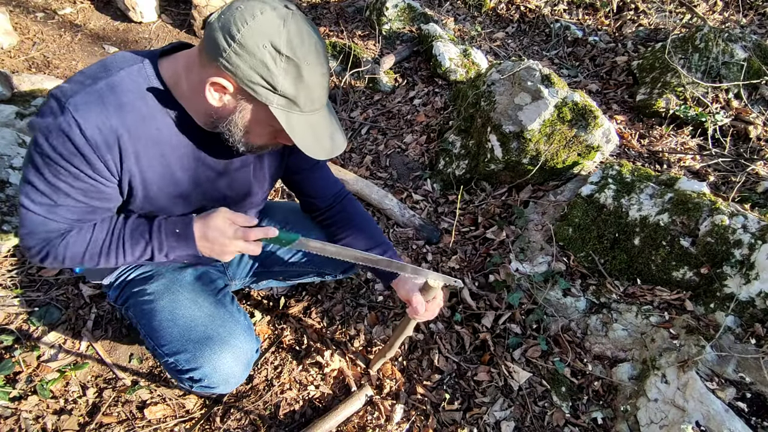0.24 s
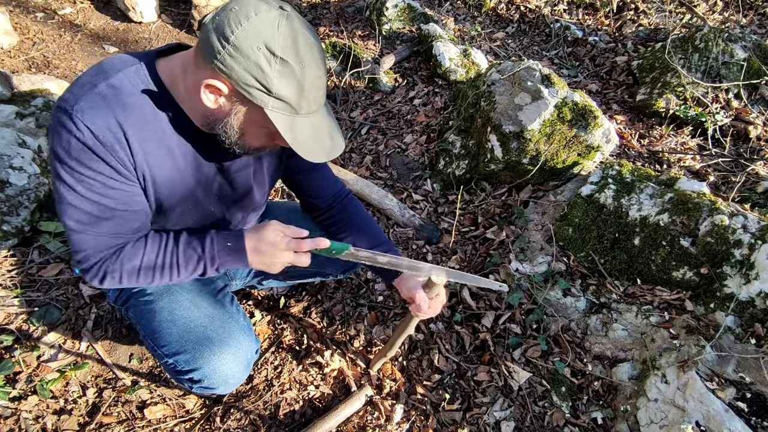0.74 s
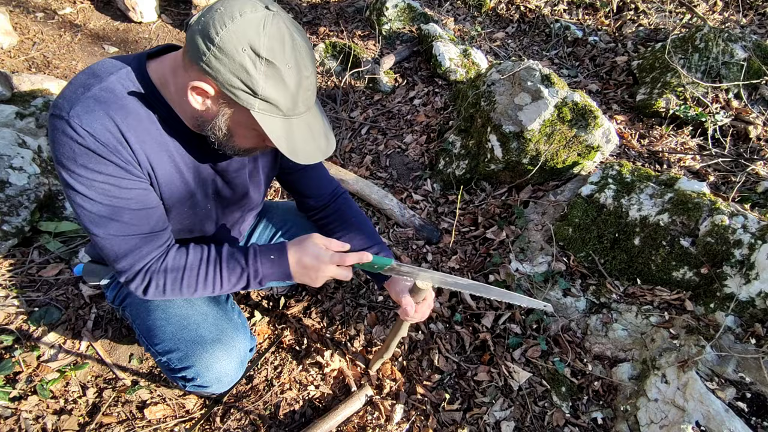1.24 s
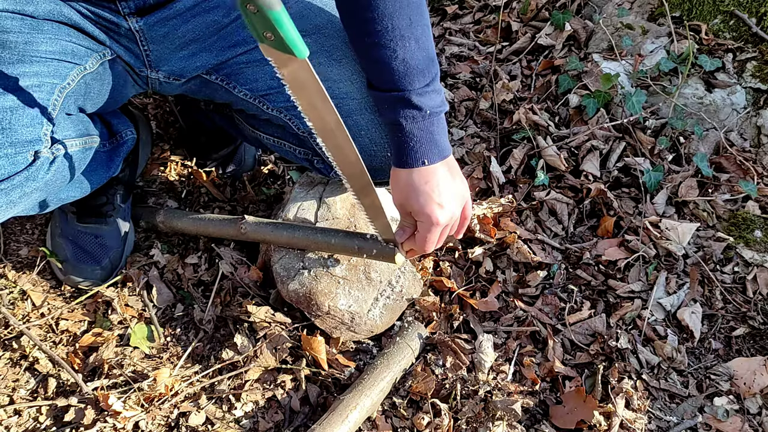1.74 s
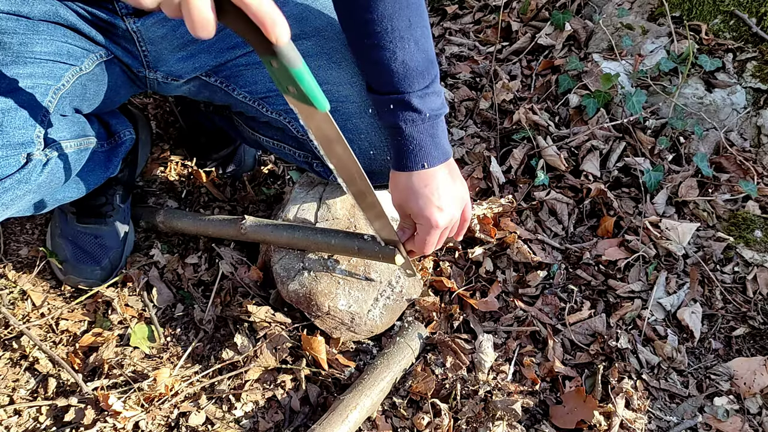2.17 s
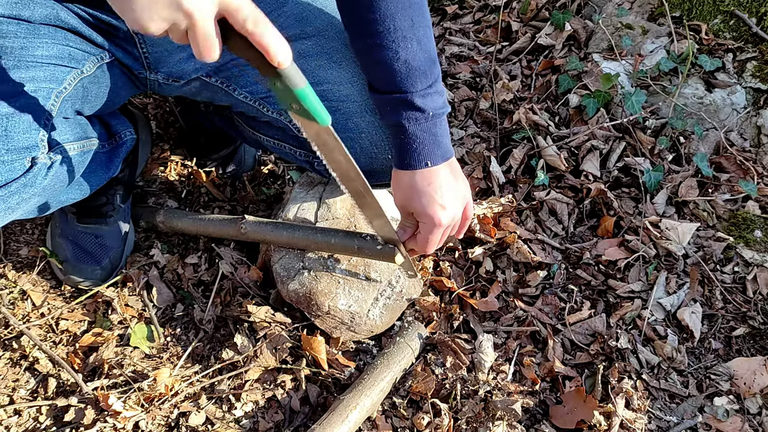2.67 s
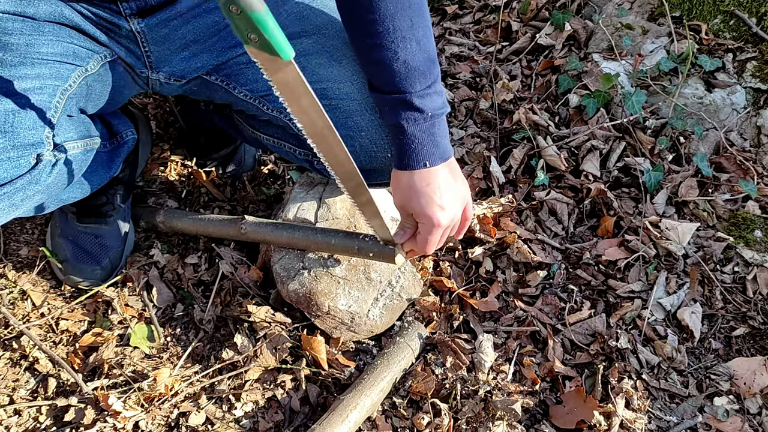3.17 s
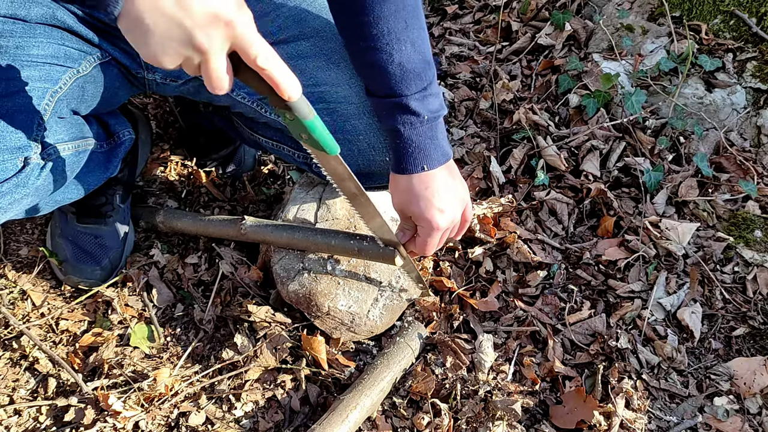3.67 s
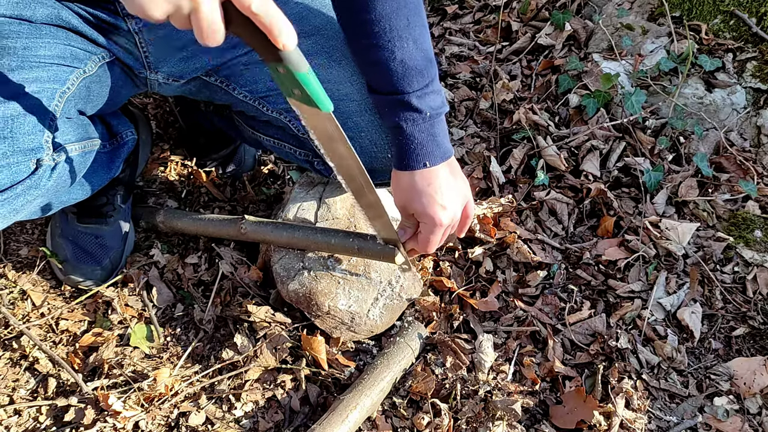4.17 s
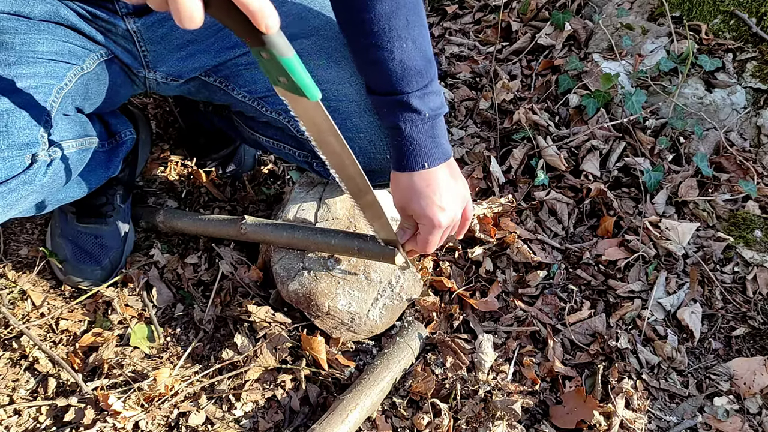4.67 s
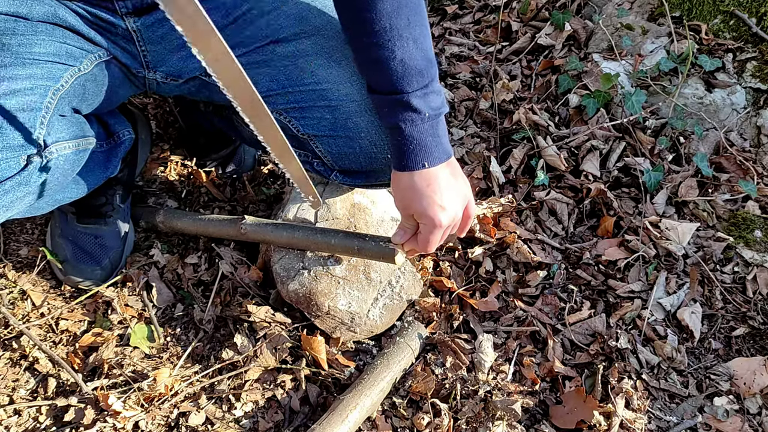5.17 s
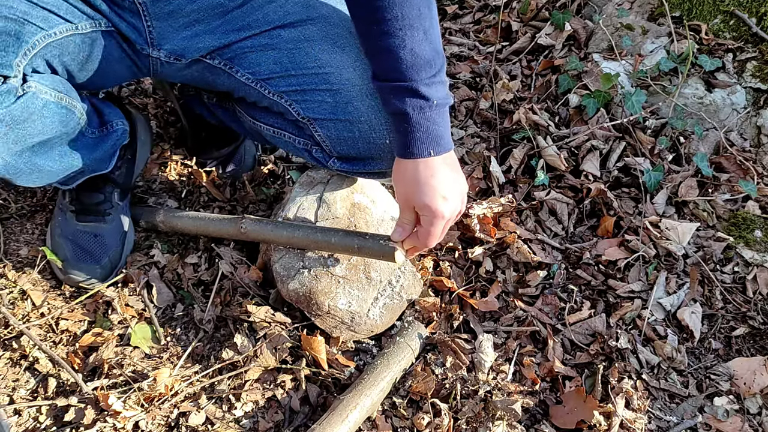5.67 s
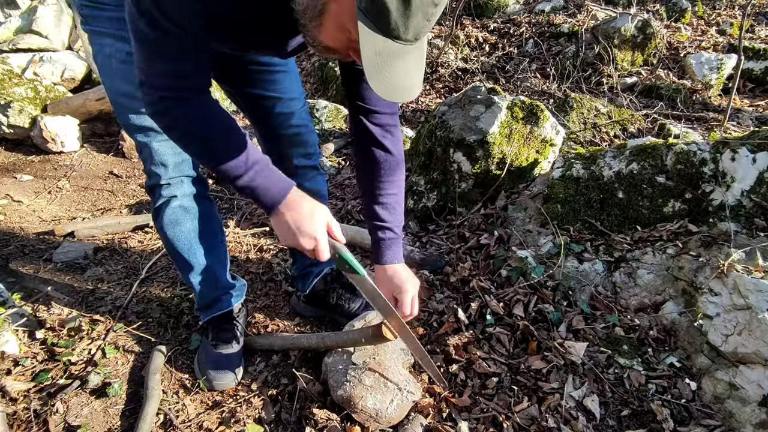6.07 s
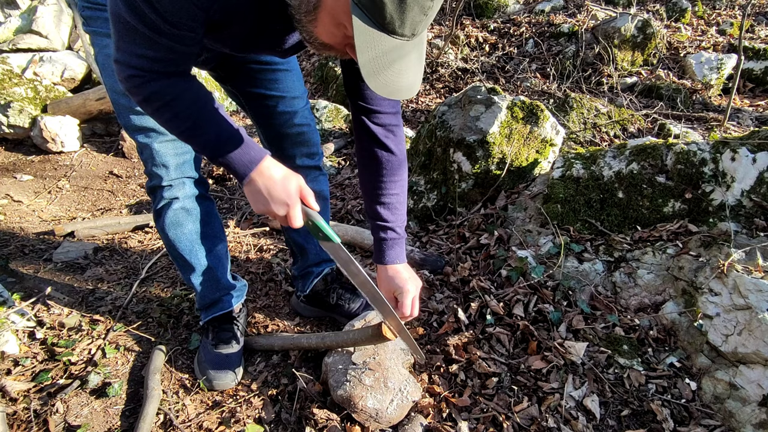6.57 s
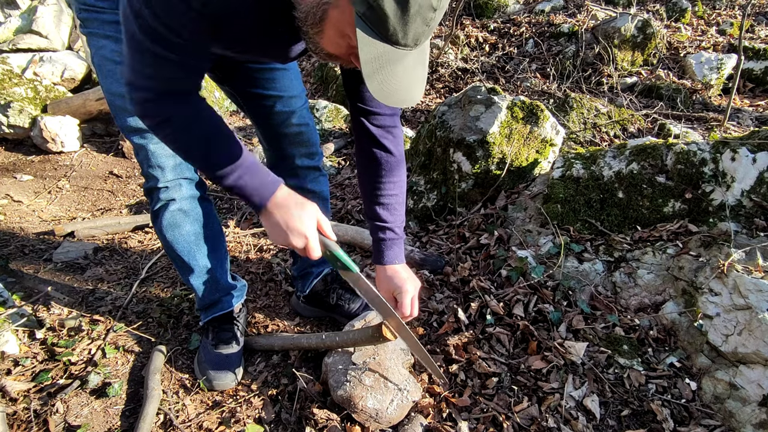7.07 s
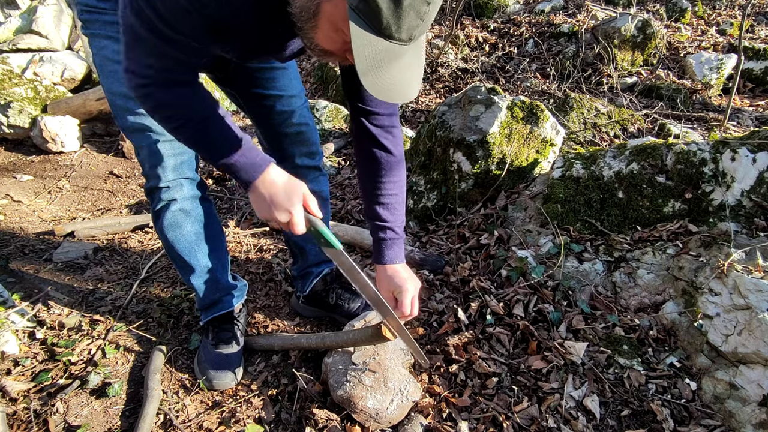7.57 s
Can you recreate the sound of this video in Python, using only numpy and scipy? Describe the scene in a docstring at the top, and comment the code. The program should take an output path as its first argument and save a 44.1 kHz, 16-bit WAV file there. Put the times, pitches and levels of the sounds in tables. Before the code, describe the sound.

Slow, thin saw strokes quicken into steady rasping on fresh wood, wind buffets rumble, then after a short gap louder strokes grate with low woody shudders.

```python
"""Slow saw strokes in the hand, then quick ones over a stone, cut a green branch outdoors. Tooth knocks
at a rate that follows the stroke and tearing noise feed resonances of blade, cut and branch.
Faint forest hiss and low rumbling wind noise lie underneath; buffets thump the microphone from about 2 s.
A pause follows, in which the blade zings; then come harder standing strokes, with short shudder tones
that bend with the tooth rate, while the wind dies away."""
import sys
import numpy as np
from scipy import signal
from scipy.fft import rfft, irfft, next_fast_len
from scipy.io import wavfile
from scipy.ndimage import uniform_filter1d

SR = 44100
rng = np.random.default_rng(int(sys.argv[2]) if len(sys.argv) > 2 else 0)


def transcribe(signal):
    """Save signal, clipped to [-1, 1], as a 16-bit WAV file at the path in sys.argv[1]."""
    frames = np.atleast_2d(signal).T
    limited = np.clip(frames, -1, 1)
    pcm = np.round(limited * 32767).astype(np.int16)
    wavfile.write(sys.argv[1], SR, pcm)


N = 344862
TIME = np.arange(N) / SR
SIZE = next_fast_len(N + 8192, True)  # padded, so that filter tails do not wrap round
FREQ = np.maximum(np.arange(SIZE // 2 + 1) * SR / SIZE, 1)

# Levels in the tables are nominal: mixes, trims and random flutter come on top.
# saw strokes, pull and push by turns, each hold opening with a pull: (start [s], end [s], level [dB])
STROKES = [(-0.089, 0.253, -47.5), (0.287, 0.602, -49.5), (0.643, 1.033, -47.0), (1.065, 1.45, -51.5),
           (1.316, 1.486, -48.5), (1.475, 1.653, -45.5), (1.64, 1.839, -49), (1.807, 2.003, -46.5),
           (1.999, 2.172, -50), (2.129, 2.337, -45.5), (2.336, 2.52, -49.5), (2.499, 2.678, -46),
           (2.699, 2.865, -49.5), (2.883, 3.052, -46), (3.079, 3.258, -46.5), (3.231, 3.452, -47.0),
           (3.455, 3.617, -48.5), (3.597, 3.787, -45), (3.793, 3.986, -49.5), (3.963, 4.149, -45),
           (4.152, 4.338, -49), (4.315, 4.514, -46.5), (4.532, 4.69, -48), (4.663, 4.896, -46.5),
           (4.913, 5.139, -49), (5.877, 6.068, -41.5), (6.056, 6.238, -42.5), (6.223, 6.41, -42),
           (6.403, 6.578, -40.5), (6.559, 6.733, -40.5), (6.723, 6.892, -38.5), (6.877, 7.065, -40),
           (7.054, 7.235, -39.0), (7.226, 7.4, -39.5), (7.392, 7.573, -38), (7.56, 7.739, -41),
           (7.737, 7.89, -41.0)]
# bounds of the three holds, in the hand, kneeling over the stone, standing: (time [s])
HOLD_BOUNDS_S = [0, 1.328, 5.7, 7.9]
# arm in each hold, a pull row then a push row: (hardest bite [0-1 of stroke], sharpness of swell [power],
# top tooth rate of a usual stroke [Hz], rasp against blade [dB], branch against blade [dB])
ARM_HAND = [(.35, 1.61, 320, -6, -18), (.28, .56, 298, -8, -10)]
ARM_KNEEL = [(.52, 1.2, 379.7, -8, -3), (.72, 2.63, 300.2, -9.5, -1.65)]
ARM_STAND = [(.45, 1.3, 319.2, -7, -7), (.65, 2.15, 400, -6.5, -0.5)]
# blade resonances in each hold: (frequency [Hz], width [Hz], lift [dB])
BLADE_HAND = [(3400, 1100, 5.5), (4550, 300, 5.5), (5130, 220, 2), (6720, 320, 9), (10540, 650, 5.5),
              (12030, 370, 11.5), (13000, 200, 10), (13540, 224, 13)]
BLADE_KNEEL = [(1640, 140, 4.2), (5000, 100, 2.2), (6790, 100, 11), (7450, 52, 3.8), (7990, 240, 7.2),
               (11350, 240, 1.5), (11400, 110, 3.5), (12998, 58, 1.3), (15200, 130, 3.3)]
BLADE_STAND = [(2180, 360, 9.3), (2790, 120, 7.4), (4940, 44, 2), (5380, 120, 3.8), (7030, 110, 10.4),
               (10180, 370, 4.9), (11970, 140, 3.6), (12800, 130, 5.6), (13400, 230, 4.7)]
# broad tone of the blade in each hold: (frequency [Hz], relative level [dB])
SLOPE_HAND = [(900, -13), (2000, -12), (3000, -11.5), (6000, -8), (10000, -7.5), (15400, -15)]
SLOPE_KNEEL = [(900, -5.5), (2000, -12), (3600, -6.5), (6000, -8), (10000, -7), (15400, -9.5)]
SLOPE_STAND = [(900, -11.5), (1800, -21.5), (2400, -12), (4400, -7.5), (6200, -7), (10000, -9),
               (15400, -13.5)]
# teeth rasping in the cut, broad tone: (frequency [Hz], relative level [dB])
RASP_TONE = [(250, -30), (450, -11), (560, -1.8), (680, 4.2), (850, 1.3), (1150, 0.2), (1500, -0.6),
             (1850, -10.5), (2600, -16), (5000, -17)]
# resonances of the cut in each hold: (frequency [Hz], width [Hz], lift [dB])
CUT_HAND = [(760, 100, 5), (1380, 300, 1.5)]
CUT_KNEEL = [(693, 86, 2.2), (940, 680, 2.2), (1330, 100, 0.95)]
CUT_STAND = [(430, 300, 6.4), (1190, 300, 7.9)]
# bending modes of the branch in each hold: (frequency [Hz], width [Hz], relative level [dB])
BRANCH_HAND = [(150, 80, -29), (260, 58, 3), (383, 240, -7.5)]
BRANCH_KNEEL = [(183.6, 91, 0), (247, 98, 2), (323.5, 90, 0.5), (397, 72, -4)]
BRANCH_STAND = [(116, 48, -5), (188.55, 56, -3.5), (263, 12, -0.5), (312, 31, 3.5), (410, 133, -2)]
# wind rumble on the microphone: (time [s], level [dB], left minus right [dB])
WIND = [(0.0, -72.5, 12), (0.06, -62, -4), (0.49, -60.5, 4.5), (1.9, -57.5, -2), (1.97, -59, -14),
        (2.15, -55, 25), (2.25, -62.5, -8), (2.61, -66, -9), (2.66, -62.5, 3), (3.14, -70, -0.5),
        (3.36, -48.5, -11), (3.5, -57, -3.5), (3.55, -46.5, -32), (4.33, -53, 8), (4.95, -58, 1),
        (5.07, -54.5, 8.0), (5.16, -44, -18.0), (5.28, -49, 12), (5.47, -55, 10), (5.6, -45, -16),
        (5.65, -51.5, 6), (5.85, -63.5, -4)]
# colour of the rumble: (frequency [Hz], relative level [dB])
WIND_COLOUR = [(20, -33), (40, -28), (70, -0.5), (110, 0), (160, -6.5), (240, -15), (400, -32.5),
               (900, -67)]
# single buffets of wind: (centre [s], level [dB], left minus right [dB])
BUFFETS = [(2.125, -42, 4), (2.583, -35.5, -11), (3.595, -33, -20), (3.659, -35.5, -7), (3.815, -25, -4),
           (4.435, -35.5, -3), (5.154, -31.5, -30), (5.3, -35, 24), (5.585, -31, -21)]
# colour of the eddies behind a buffet: (frequency [Hz], relative level [dB])
WAKE_COLOUR = [(40, -35), (110, 4), (220, -6.5), (330, -11.5), (480, -40), (900, -62)]
# still forest air: (frequency [Hz], relative level [dB])
AIR_COLOUR = [(150, -12), (300, 0.5), (600, -7), (1200, -10), (2200, -18.5), (4000, -20.5), (6500, -21),
              (8200, -28.5), (10500, -24.5), (15000, -33.5)]
# the blade zings as it enters or leaves the cut: (start [s], length [s], level [dB])
SCRAPES = [(0.328, 0.006, -49.5), (0.973, 0.017, -61), (2.724, 0.036, -58), (3.204, 0.0092, -53),
           (5.088, .048, -43.5), (5.745, 0.07, -54.5), (5.849, 0.023, -45), (6.243, 0.017, -55),
           (6.588, 0.014, -50), (7.243, 0.014, -53), (7.588, 0.013, -54)]
# how a scrape is shared out: (blade [dB], rasp [dB], branch [dB])
SCRAPE_MIX_DB = (-0.5, -15.5, -8)
# a tooth snags and jolts the wood: (start [s], level [dB])
SNAGS = [(2.933, -52), (5.848, -55), (5.953, -34), (6.155, -45)]
# how a snag is shared out: (blade [dB], rasp [dB], branch [dB])
SNAG_MIX_DB = (-24, -11.5, 1)
# the teeth catch and the branch shudders: (centre [s], length [s], level [dB], pitch at centre [Hz])
SHUDDERS = [(5.958, 0.067, -27.5, 296.3), (5.993, .09, -31, 262), (6.164, 0.088, -29.5, 303.7),
            (6.322, 0.054, -27, 297.8), (6.488, 0.033, -31, 310), (6.54, .051, -46, 304),
            (6.799, 0.037, -38.5, 356), (6.849, 0.049, -37.5, 313), (7.007, 0.083, -28, 307),
            (7.131, 0.028, -34, 339), (7.346, 0.072, -35.5, 315), (7.472, .022, -34, 309),
            (7.536, 0.047, -37.5, 284.6), (7.674, .087, -28, 306), (7.815, 0.033, -34.5, 318.2)]
# dips and bumps of the microphone housing: (frequency [Hz], width [Hz], lift [dB])
HOUSING = [(5620, 110, -6), (7070, 260, -10), (8400, 1150, 7), (11270, 250, -15)]
# treble balance of the two ports: (frequency [Hz], left minus right [dB])
PORT_BALANCE = [(300, -0.5), (1500, -1.5), (3500, -1), (5000, -3), (6500, -0.5), (8100, -13.5), (9200, -4),
                (10400, 8), (11700, 0), (15000, -1)]

PULL_EASE_S, PUSH_EASE_S = 0.025, 0.041  # the teeth grip sooner on a pull than on a push
TOOTH_RATE_PER_DB = 0.28  # a harder stroke is faster: share of the rate per dB over the usual stroke
BUFFET_HZ, BUFFET_CYCLES = 121, 2.3
WAKE_S, WAKE_DB = 0.05, -9
SNAG_S = 0.031
SHUDDER_FOLLOW = 0.22  # power by which a shudder's pitch follows the tooth rate
PORT_LAG_S = 7e-5
TOP_HZ = 15550


def undb(db):
    """Turn decibels into gain."""
    return 10 ** (np.asarray(db) / 20)


def noise():
    """Unrelated white noise for left and right."""
    return rng.standard_normal((2, N))


def walk(rate):
    """Random values, rate per second, joined by straight lines; spread near 1."""
    k = max(int(SR / rate), 1)
    steps = np.repeat(rng.standard_normal(N // k + 1), k)
    return 1.27 * uniform_filter1d(steps, k)[:N]


def slope_db(points):
    """Outline in dB on the frequency grid, straight over log frequency."""
    hz, db = np.transpose(points)
    return np.interp(np.log(FREQ), np.log(hz), db)


def bells_db(rows):
    """Bell-shaped lifts and dips in dB on the frequency grid."""
    return sum(db / (1 + (2 * (FREQ - hz) / width) ** 2) for hz, width, db in rows)


def filtered(x, response):
    """Apply a frequency response."""
    return irfft(rfft(x, SIZE) * response, SIZE)[..., :N]


def coloured(x, response):
    """Apply a response scaled to keep the power of white noise."""
    return filtered(x, response / np.sqrt(np.mean(np.abs(response) ** 2)))


def spread(pair, side_db):
    """Use two signals as mid and side."""
    side = undb(side_db)
    return (pair[0] + side * pair[1] * np.array([[1], [-1]])) / np.sqrt(1 + side ** 2)


def window(centre, length):
    """A smooth swell and fall."""
    return np.cos(np.pi * np.clip((TIME - centre) / length, -.5, .5)) ** 2


def jolt(start, length):
    """A quick rise and a slower fall."""
    return np.interp(TIME - start, [0, length / 10, length], [0, 1, 0]) ** .5


def ringing(x, rings, place):
    """Pass x through rings (spots, 2, samples), crossfading at even power as the blade slides."""
    out = 0
    for spot, ring in zip(np.linspace(0, 1, len(rings)), rings):
        near = np.sqrt(np.maximum(1 - np.abs(place - spot) * (len(rings) - 1), 0))
        ring = ring / np.linalg.norm(ring, axis=1, keepdims=True)
        out = out + signal.fftconvolve(x * near, ring, axes=1)[:, :N]
    return out


def strokes_by_hold():
    """Each stroke with its hold's limits, push flag, arm row and dB over the usual stroke of its kind."""
    for first, last, ways in zip(HOLD_BOUNDS_S, HOLD_BOUNDS_S[1:], (ARM_HAND, ARM_KNEEL, ARM_STAND)):
        rows = np.array([row for row in STROKES if first <= (row[0] + row[1]) / 2 < last])
        for k, row in enumerate(rows):
            pushing = k % 2
            effort_db = row[2] - rows[pushing::2, 2].mean()
            yield row, (first, last), pushing, ways[pushing], effort_db


def arm(rate_power=.65, rest_db=-73, snag_db=1.45):
    """Strokes set the tooth rate, the place along the blade (0-1) and the drive of blade, rasp, branch."""
    rate, place, drive = np.full(N, 40.), np.zeros(N), np.zeros((3, N))
    for (start, end, db), hold, pushing, way, effort_db in strokes_by_hold():
        crest, power, tooth_hz, rasp_db, branch_db = way
        on = slice(*np.searchsorted(TIME, np.clip([start, end], *hold)))
        u = (TIME[on] - start) / (end - start)
        swing = np.interp(u, [0, np.clip(crest, .1, .9), 1], [0, .5, 1])
        # the hand's pressure peaks early or late; its speed is more even
        speed = np.abs(np.sin(np.pi * (u + swing) / 2)) ** (rate_power * power)
        pressure = np.abs(np.sin(np.pi * swing)) ** power
        top_rate = tooth_hz * (1 + TOOTH_RATE_PER_DB * effort_db)
        rate[on] = np.maximum(top_rate * speed, rate[on])
        # each stroke uses a different length of the blade
        reach = rng.uniform(.5, 1)
        place[on] = (1 + (-1) ** pushing * np.cos(np.pi * u) * reach) / 2
        ease = np.minimum((TIME[on] - start) / (PUSH_EASE_S if pushing else PULL_EASE_S), 1)
        levels = undb([db, db + rasp_db, db + branch_db])[:, None]
        drive[:, on] += levels * ease * pressure
    # uneven grain makes the blade snag and slip
    drive *= undb(snag_db * walk(70))
    # the blade still rubs a little as it turns round
    moving = uniform_filter1d(1. * (drive[0] > 0), SR // 10)
    drive[0] += undb(rest_db) * np.sqrt(np.abs(moving))
    return rate, place, drive


def teeth(rate, jitter=0.026, scatter_db=1.5, set_db=6.0):
    """One knock per tooth, alternate sets biting unequally; also the phase within each tooth."""
    turns = np.cumsum(rate * undb(.18 * walk(45))) / SR + jitter * walk(300)
    tooth = np.floor(turns + 1).astype(int)
    scatter = np.clip(rng.standard_normal(4096), -2, 2)[tooth]
    size = undb(scatter_db * scatter + set_db * (-1.) ** tooth)
    size /= np.sqrt(np.mean(size ** 2))
    bites = np.diff(tooth, prepend=tooth[0]) > 0
    # sqrt(SR / rate) keeps the power even when knocks are sparse
    return bites * size * np.sqrt(SR / rate), turns % 1


def tearing(phase, depth=0.24, grain_db=0.5):
    """Fibres tear as dense noise, hardest around each tooth's bite."""
    gate = (1 + depth * np.cos(2 * np.pi * phase)) * undb(grain_db * walk(700))
    return noise() * gate / np.sqrt(np.mean(gate ** 2))


def steel(tear, place, t60=0.039, direct=0.17, count=120, size=6):
    """Quickly damped blade modes; pitch and strength depend on where the cut grips the blade."""
    t = TIME[:4096]
    hz = (np.arange(count) + rng.random((size, count)))[..., None] * SR / 2 / count
    modes = np.sin(2 * np.pi * hz * t) * np.exp(-np.log(1000) * t / t60)
    strengths = np.cos(2 * np.pi * rng.random((size, 2, count)))
    spectra = rfft(strengths @ modes)
    # neighbouring modes share a steady total of energy
    spectra /= np.sqrt(uniform_filter1d(np.abs(spectra) ** 2, size=64))
    return (direct * tear + ringing(tear, irfft(spectra), place)) / np.hypot(1, direct)


def green_wood(knocks, place, t60=0.035, side_db=-7.0, count=5):
    """Damp wood smears each knock into a short decaying burst of noise."""
    t = TIME[:2048]
    decay = np.exp(-np.log(1000) * t / t60)
    rings = [spread(rng.standard_normal((2, len(t))), side_db) * decay for _ in range(count)]
    return ringing(np.array([knocks, knocks]), rings, place)


def branch_response(modes, low_hz=110, high_hz=480):
    """Bending modes of the branch, alternating in sign; it radiates little below or above them."""
    ring = 0
    for k, (hz, width, db) in enumerate(modes):
        ring = ring + (-1) ** k * undb(db) / (1 + 1j * (FREQ / hz - hz / FREQ) * hz / width)
    return ring / (1 + (low_hz / FREQ) ** 4) / (1 + (FREQ / high_hz) ** 6)


def saw(rate, place, drive, blade_db=-0.71, rasp_db=-0.47, branch_db=1, rasp_tear=0.44, branch_tear=0.86):
    """Knocks and tearing drive the cut and branch, tearing the blade; resonances change with the hold."""
    blade_drive, rasp_drive, branch_drive = drive
    knocks, phase = teeth(rate)
    tear = tearing(phase)
    hiss = steel(tear * blade_drive, place)
    push = (knocks + branch_tear * spread(tear, -12.0)) * branch_drive / np.hypot(1, branch_tear)
    rasp = green_wood(knocks, place) + rasp_tear * spread(tear, -11)
    rasp = rasp * rasp_drive / np.hypot(1, rasp_tear)
    holds = [(BLADE_HAND, SLOPE_HAND, CUT_HAND, BRANCH_HAND),
             (BLADE_KNEEL, SLOPE_KNEEL, CUT_KNEEL, BRANCH_KNEEL),
             (BLADE_STAND, SLOPE_STAND, CUT_STAND, BRANCH_STAND)]
    out = 0
    for start, end, (blade, slope, cut, branch) in zip(HOLD_BOUNDS_S, HOLD_BOUNDS_S[1:], holds):
        held = (TIME >= start) & (TIME < end)
        out += undb(blade_db) * coloured(hiss * held, undb(slope_db(slope) + bells_db(blade)))
        out += undb(rasp_db) * coloured(rasp * held, undb(slope_db(RASP_TONE) + bells_db(cut)))
        out += undb(branch_db) * coloured(push * held, branch_response(branch))
    return out


def wind_rumble(wind_db=1.87, flutter_db=3.0, calm_db=-11, calm_s=0.69):
    """Eddies rumble on each port separately, as low noise with a drifting level and balance."""
    s, *columns = np.transpose(WIND)
    db, pan_db = (np.interp(TIME, s, c) for c in columns)
    db = db + calm_db * np.clip((TIME - s[-1]) / calm_s, 0, 1)  # the breeze dies away
    sides = undb(np.array([pan_db, -pan_db]) / 2)
    sides *= 2 / np.sqrt(np.sum(sides ** 2, axis=0))
    rumble = coloured(noise(), undb(slope_db(WIND_COLOUR)))
    return rumble * sides * undb(db + wind_db + flutter_db * walk(25))


def forest(air_db=-64.0):
    """Faint even hiss of the air: wide coloured noise with a slight slow drift."""
    return undb(air_db + .5 * walk(2.7)) * coloured(spread(noise(), -1.5), undb(slope_db(AIR_COLOUR)))


def scrapes():
    """Brief extra drive as the blade enters or leaves the cut."""
    total = sum(undb(db) * jolt(start, length) for start, length, db in SCRAPES)
    return undb(SCRAPE_MIX_DB)[:, None] * total


def buffets():
    """Strong eddies strike as short low thumps, each with a brief noisy wake."""
    out = np.zeros((2, N))
    eddies = undb(WAKE_DB) * coloured(noise(), undb(slope_db(WAKE_COLOUR)))
    for centre, db, pan_db in BUFFETS:
        sides = undb([pan_db / 2, -pan_db / 2])[:, None]
        thump = window(centre, BUFFET_CYCLES / BUFFET_HZ) * np.cos(2 * np.pi * BUFFET_HZ * (TIME - centre))
        wake = eddies * window(centre + WAKE_S / 5, WAKE_S)
        out += 2 * sides / sides.sum() * undb(db) * (thump + wake)
    return out


def snags():
    """Brief extra drive, mostly of the branch, as a tooth snags and jolts the wood."""
    total = sum(undb(db) * jolt(start, SNAG_S) for start, db in SNAGS)
    return undb(SNAG_MIX_DB)[:, None] * total


def shudders(rate, rough_db=1.53, half_db=-15.0, overtone_db=-24):
    """Teeth lock to the branch's main mode: short tones that bend with the saw's speed."""
    out, wobble = np.zeros(N), undb(rough_db * walk(250))
    for centre, length, db, hz in SHUDDERS:
        on = slice(*np.searchsorted(TIME, [centre - length / 2, centre + length / 2]))
        u = (TIME[on] - centre) / length + .5
        pitch = hz * (rate[on] / np.interp(centre, TIME, rate)) ** SHUDDER_FOLLOW
        angle = 2 * np.pi * (np.cumsum(pitch) / SR + rng.random())
        # the alternate set of the teeth adds lines at half and one and a half times the pitch
        half_lines = np.sin(angle / 2) + np.sin(angle + angle / 2) / 2
        tone = np.sin(angle) + undb(half_db) * half_lines + undb(overtone_db) * np.sin(2 * angle)
        out[on] += np.sqrt(2) * undb(db) * np.sin(np.pi * u) ** 2 * tone
    return out * wobble


def scene():
    """The saw and its shudders, with wind and forest air."""
    rate, place, drive = arm()
    drive += scrapes() + snags()
    return saw(rate, place, drive) + wind_rumble() + forest() + buffets() + shudders(rate)


def record(dry):
    """The housing colours the treble unlike at each port; the left hears a little later; the top is cut."""
    balance_db = slope_db(PORT_BALANCE)
    sides = undb(np.array([balance_db, -balance_db]) / 2)
    sides /= np.sqrt(np.mean(sides ** 2, axis=0))
    lag = np.exp(-2j * np.pi * FREQ * np.array([[PORT_LAG_S], [0]]))
    low_pass = 1 / np.sqrt(1 + (FREQ / TOP_HZ) ** 300)
    return filtered(dry, sides * lag * undb(bells_db(HOUSING)) * low_pass)


dry = scene()
out = record(dry)
transcribe(out)
```